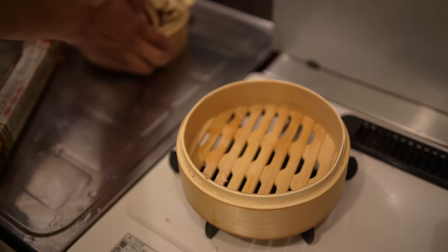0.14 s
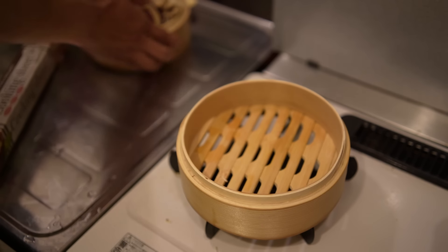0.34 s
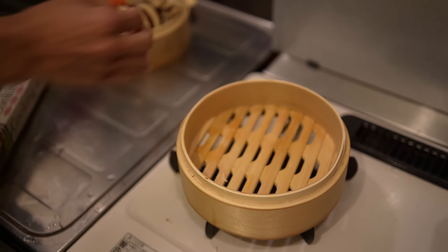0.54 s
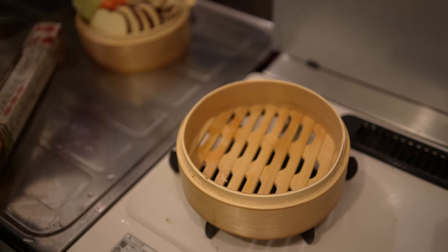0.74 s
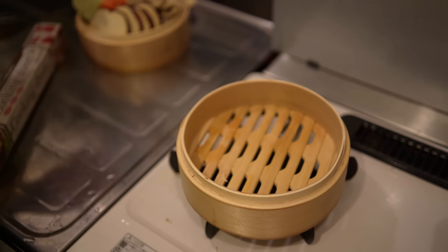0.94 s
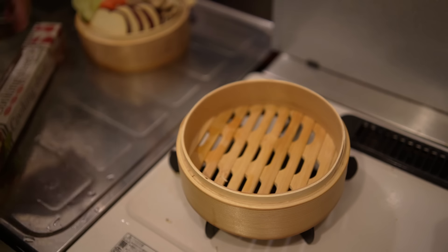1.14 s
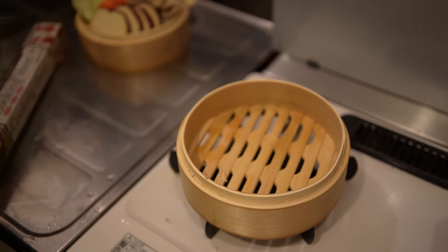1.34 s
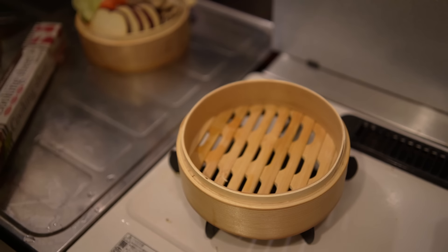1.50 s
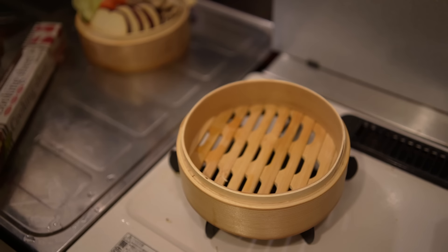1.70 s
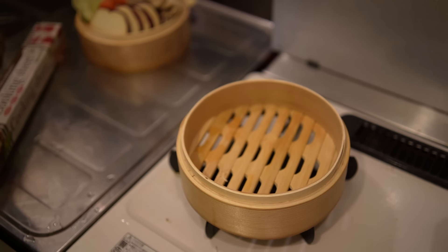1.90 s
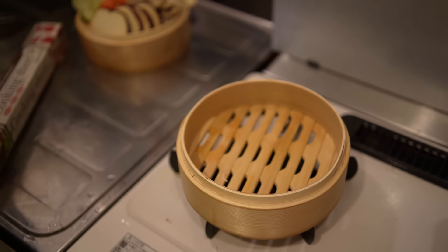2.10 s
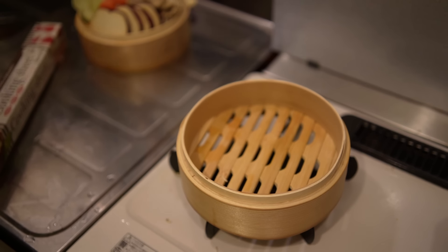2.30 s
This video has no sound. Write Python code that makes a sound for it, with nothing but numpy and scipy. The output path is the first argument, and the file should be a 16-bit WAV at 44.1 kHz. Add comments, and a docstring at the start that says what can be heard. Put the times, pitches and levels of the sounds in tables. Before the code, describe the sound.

A bamboo steamer basket bumps softly at 0.2 seconds, then is set on a steel counter at 0.4 with a quick, hollow double knock, the loudest sound, ringing briefly in a small kitchen. Faint rubbing trails off by about 1.2 seconds. From 1.7 to 2.3 come short, dry handling rustles, with light bumps and wooden clacks around 2 seconds. A quiet, low hum runs underneath.

```python
"""A soft bump of a bamboo steamer basket, then a hollow double knock as it is set down on a steel counter.
Each impact excites the modes of counter and basket, which ring on in a small room. Handling adds
the dry rustle of friction and a few light bumps and clacks, over a low kitchen hum.
The microphone has a deep notch in the treble."""
import sys
import numpy as np
from scipy import signal
from scipy.fft import rfft, irfft
from scipy.io import wavfile

SR = 44100
rng = np.random.default_rng(int(sys.argv[2]) if len(sys.argv) > 2 else 0)


def put_to_file(sound):
    """Save the sound as 16-bit audio at rate SR, in the file named by the first command-line argument."""
    columns = np.atleast_2d(sound).T  # one column per channel
    safe = np.clip(columns, -1, 1)
    whole_steps = np.round(safe * 32767)
    wavfile.write(sys.argv[1], SR, whole_steps.astype(np.int16))


N = 103635

# spectrum of the tick of a hard contact (frequency [Hz], relative level [dB])
TICK_SPECTRUM = [(2000, 9), (4000, 7), (7000, -13.5), (10500, -12.5), (14000, 4), (16000, -4)]
TICK_T60_S = 0.078


def knocks(t):
    """Impact excitation: a tick and a thud, then free vibration; soft contacts are dull, light ones thin."""
    # contacts of basket and counter
    # (time [s], ring gain [dB], low-pass [Hz], high-pass [Hz], thud gain [dB], tick gain [dB])
    contacts = [(0.1899, -12, 583, 125, -21, -80), (0.3973, -14.5, 1540, 119, -20, -35.5),
                (.4025, -6, 5600, 54.7, -11.5, -38.5), (.4138, -9, 1350, 42, -9.5, -70)]
    hard_share = 0.21  # part of the ring that bypasses the low-pass
    ring = modes(t)
    thud = np.sin(2 * np.pi * 252 * t) * fade(t, t60=0.044)  # the basket's hollow note
    out = np.zeros(N)
    for start, ring_db, dull_hz, thin_hz, thud_db, tick_db in contacts:
        body = ring + clatter(t)
        body = signal.lfilter(*signal.butter(4, dull_hz, fs=SR), body) + hard_share * body
        body = signal.lfilter(*signal.butter(2, thin_hz, "high", fs=SR), body)
        tick = burst(t, TICK_SPECTRUM, TICK_T60_S)
        add(out, start, undb(ring_db) * body + undb(thud_db) * thud + undb(tick_db) * tick)
    return out


def modes(t):
    """Modal superposition: counter and basket ring as a sum of damped sinusoids."""
    # one entry per mode (frequency [Hz]), (relative level [dB]), (T60 [s])
    frequencies = [146, 162, 204, 258, 352, 404, 470, 550, 594, 644, 729, 870, 932, 1168, 1740, 1852]
    levels = [-29.5, -29, -28, -18.5, -26.5, -27.5, -20.5, -27.5, -33.5, -21.5, -22, -28, -21.5, -22, -26,
              -48]
    decays = [0.85, 0.81, 0.7, 0.41, 0.4, 0.24, 0.36, 0.67, 0.45, 0.93, 0.42, 0.43, 0.085, 0.28, 0.31, .22]
    return sum((-1) ** k * undb(db) * np.sin(2 * np.pi * hz * t) * fade(t, t60)
               for k, (hz, db, t60) in enumerate(zip(frequencies, levels, decays)))


def clatter(t, band_count=24, gain_db=-16, rise_s=0.0014):
    """Modal overlap: close resonances of slats and room merge into noise whose treble dies first."""
    # spectrum of the resonances (frequency [Hz], relative level [dB])
    spectrum = [(40, -6), (110, -8.5), (300, -1.5), (750, -3), (1400, -9), (2250, -11), (2750, -23.5),
                (4000, -27), (7500, -44.5), (14000, -28)]
    # their decay (frequency [Hz], T60 [s])
    decays = [(60, 0.35), (300, 0.55), (900, 0.39), (2000, .31), (5000, 0.28), (12000, .09)]
    hz = np.fft.rfftfreq(N, 1 / SR)
    noise_bins = rfft(colour(rng.standard_normal(N), spectrum))
    centres = np.geomspace(40, 16000, band_count)
    out = np.zeros(N)
    for centre, weights in zip(centres, np.eye(band_count)):
        triangle = read(list(zip(centres, weights)), hz)
        out += irfft(noise_bins * triangle, N) * fade(t, read(decays, centre))
    return undb(gain_db) * out * (1 - np.exp(-t / rise_s))


def clacks(t):
    """Broadband excitation: brief, hard wooden contacts give a tick and a short bright clatter."""
    # light contacts (time [s], clatter gain [dB], tick gain [dB])
    contacts = [(1.977, -37.5, -43), (2.012, -33, -37)]
    # spectrum of the struck wood (frequency [Hz], relative level [dB])
    spectrum = [(150, 3), (400, 5.5), (700, -2), (1400, -4.5), (2000, -0.5), (2900, -5), (3900, -5.5),
                (5200, -18), (8000, -26), (14000, -16)]
    out = np.zeros(N)
    for start, wood_db, tick_db in contacts:
        wood = burst(t, spectrum, t60=0.3)
        tick = burst(t, TICK_SPECTRUM, TICK_T60_S)
        add(out, start, undb(wood_db) * wood + undb(tick_db) * tick)
    return out


def bumps(t, spread=0.78):
    """Cushioned impact: a slow contact swells one low note, which reverberation holds briefly."""
    # soft contacts (time [s], frequency [Hz], swell [s], note level [dB], room gain [dB])
    contacts = [(0.654, 338, 0.011, -47, -45), (0.848, 144.8, 0.045, -50, -65),
                (1.771, 304, 0.019, -48, -48), (1.873, 109, 0.0043, -37.5, -46),
                (1.874, 282, 0.0059, -39, -38), (1.981, 342, 0.0092, -45, -41.5),
                (2.017, 292, 0.0053, -26.5, -35), (2.058, 270, 0.0055, -34, -44),
                (2.061, 106, 0.007, -41.5, -42.5)]
    out = np.zeros(N)
    for start, hz, swell, note_db, room_db in contacts:
        note = np.sin(2 * np.pi * hz * t) * t / swell * np.exp(1 - t / swell)
        edges_hz = [hz / (1 + spread), hz * (1 + spread / 2)]
        band = signal.butter(2, edges_hz, "band", fs=SR, output="sos")
        noise = unit(signal.sosfilt(band, rng.standard_normal(N)))
        room = noise * fade(t, t60=0.45) * (1 - np.exp(-t / swell))
        add(out, start, undb(note_db) * note + undb(room_db) * room)
    return out


def rustles(t, sizzle_release_s=0.026, scrape_release_s=0.054):
    """Friction noise: strokes swell and die away as a high sizzle and a lower scrape, adding in power."""
    # handling strokes (time [s], length [s], attack [s], sizzle level [dB], scrape level [dB])
    strokes = [(0.17, 0.58, 0.27, -52, -57), (0.585, 0.22, 0.058, -53, -63), (.82, 0.18, 0.046, -58, -64),
               (1.044, 0.12, 0.053, -76, -60), (1.711, 0.082, 0.021, -41, -46.5),
               (1.835, 0.051, 0.011, -35, -45), (2.067, 0.0081, 0.0087, -28, -51.5),
               (2.084, .04, .01, -46, -53), (2.116, 0.066, 0.033, -34.5, -52),
               (2.224, 0.028, 0.025, -34, -49.5), (2.27, 0.048, 0.011, -50, -65)]
    # friction spectra (frequency [Hz], relative level [dB])
    sizzle_spectrum = [(4000, -20), (7500, -27), (10500, -12.5), (12300, -6), (14000, 3.5), (16000, 4)]
    scrape_spectrum = [(200, -3.5), (1200, -7.5), (1900, -0.5), (2900, -4.5), (3800, -4), (5000, -9),
                       (8000, -18.5), (14000, -10)]
    sizzle_power, scrape_power = np.zeros(N), np.zeros(N)
    for start, length, attack, sizzle_db, scrape_db in strokes:
        rise = np.clip((t - start) / attack, 0, 1)
        after = np.maximum(t - start - length, 0)
        sizzle_power += (undb(sizzle_db) * rise * np.exp(-after / sizzle_release_s)) ** 2
        scrape_power += (undb(scrape_db) * rise * np.exp(-after / scrape_release_s)) ** 2
    sizzle = np.sqrt(sizzle_power) * colour(grains(), sizzle_spectrum)
    scrape = np.sqrt(scrape_power) * colour(grains(), scrape_spectrum)
    return sizzle + scrape


def grains(slips_per_s=2500, spread_db=1.5, hiss_gain=0.67):
    """Shot noise: tiny random slips of a dry surface, uneven in size, blurred by a smooth hiss."""
    slips = (rng.random(N) < slips_per_s / SR) * rng.choice([-1, 1], N)
    sizes = undb(spread_db * np.minimum(rng.exponential(size=N), 5))
    return unit(slips * sizes) + hiss_gain * rng.standard_normal(N)


def room_noise(level_db=-50, flicker_db=0.9):
    """Ambient noise: a continuous, bass-heavy spectrum whose level flickers slightly."""
    # kitchen background (frequency [Hz], relative level [dB])
    spectrum = [(20, -38), (33, -3), (48, 0.5), (85, -5), (160, -2), (320, -7.5), (700, -9), (1350, -17.5),
                (2250, -15.5), (2700, -22.5), (3800, -21), (4500, -29), (8000, -40), (11000, -28.5),
                (11800, -25), (12600, -27.5), (14000, -24), (16000, -23.5)]
    return colour(rng.standard_normal(N), spectrum) * undb(level_db + flicker_db * walk(rate_hz=17))


def appliance_hum(t, depth=0.43):
    """Line spectrum: a few tones, each broadened by random amplitude and phase modulation."""
    # hum tones (frequency [Hz], level [dB])
    tones = [(146, -64), (442, -61), (641, -68), (2140, -69)]
    out = np.zeros(N)
    for hz, db in tones:
        amplitude = 1 + depth * walk(rate_hz=12)
        phase = 2 * np.pi * hz * t + depth * walk(rate_hz=12)
        out += undb(db) * unit(amplitude * np.sin(phase))
    return out


def burst(t, spectrum, t60, rise_s=0.0012):
    """Contact transient: decaying noise with a finite rise, as fibrous wood takes a moment to compress."""
    return colour(rng.standard_normal(N), spectrum) * fade(t, t60) * (1 - np.exp(-t / rise_s))


def fade(t, t60):
    """Exponential damping: 60 dB down after t60 seconds."""
    return np.exp(-np.log(1000) * t / t60)


def walk(rate_hz):
    """Low-passed noise: a smooth drift at rms 1."""
    hz = np.fft.rfftfreq(N, 1 / SR)
    return unit(irfft(rfft(rng.standard_normal(N)) / (1 + (hz / rate_hz) ** 2), N))


def colour(x, spectrum):
    """Spectral shaping by (frequency [Hz], relative level [dB]) points, scaled to rms 1."""
    gain = undb(read(spectrum, np.fft.rfftfreq(N, 1 / SR)))
    return unit(irfft(rfft(x) * gain, N))


def read(table, hz):
    """Interpolation of (frequency [Hz], value) points on a logarithmic axis."""
    points, values = np.array(table).T
    return np.interp(np.log(hz + 1e-9), np.log(points), values)


def undb(db):
    """Decibels to amplitude ratio."""
    return 10 ** (np.asarray(db) / 20)


def unit(x):
    """Normalisation to rms 1."""
    return x / np.sqrt(np.mean(x ** 2))


def add(out, start, x):
    """Delay and sum: x joins out at start [s]."""
    i = int(start * SR)
    out[i:] += x[:N - i]


def scene():
    """Linear superposition: knocks, handling and background sum at one microphone."""
    t = np.arange(N) / SR
    return (knocks(t) + clacks(t) + bumps(t) + rustles(t) + room_noise() + appliance_hum(t))[None]


def record(dry):
    """Frequency response: the microphone drops the deepest bass, notches the treble and cuts the top."""
    low_cut_hz, top_hz = 28, 15720
    notch_hz, notch_width_hz = 8270, 1500
    thin = signal.sosfilt(signal.butter(4, low_cut_hz, "high", fs=SR, output="sos"), dry)
    notched = signal.lfilter(*signal.iirnotch(notch_hz, notch_hz / notch_width_hz, fs=SR), thin)
    return signal.sosfilt(signal.ellip(12, .2, 80, top_hz, fs=SR, output="sos"), notched)


dry = scene()
out = record(dry)
put_to_file(out)
```